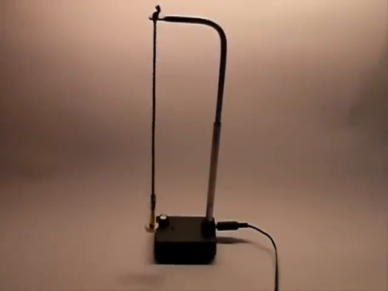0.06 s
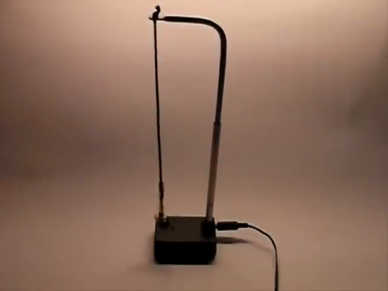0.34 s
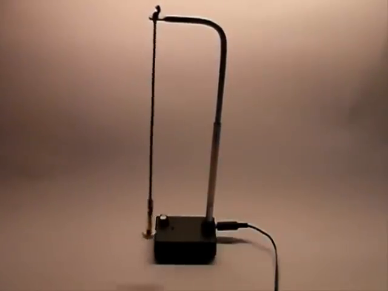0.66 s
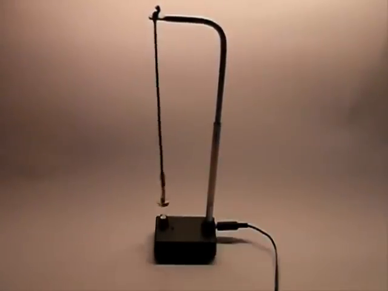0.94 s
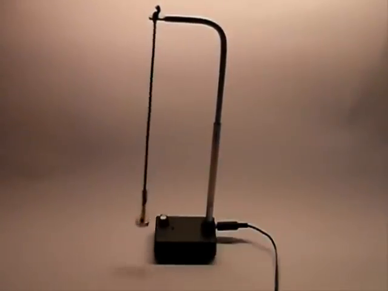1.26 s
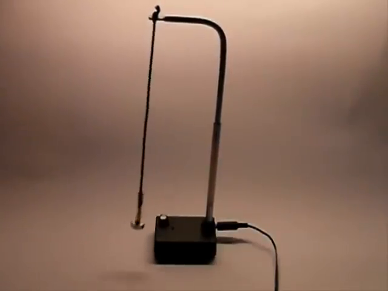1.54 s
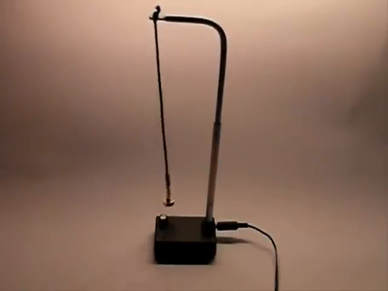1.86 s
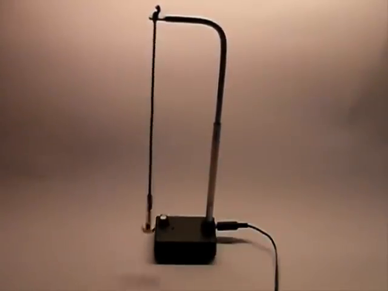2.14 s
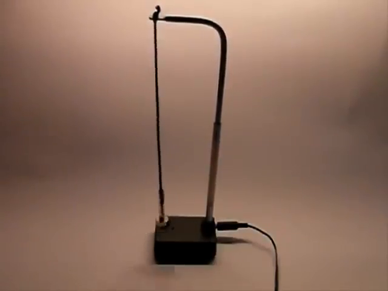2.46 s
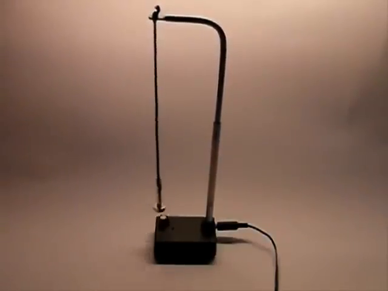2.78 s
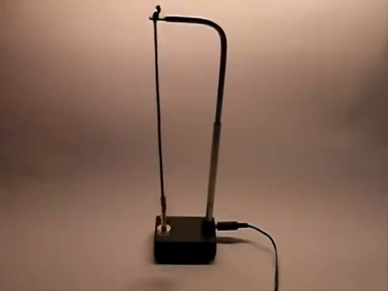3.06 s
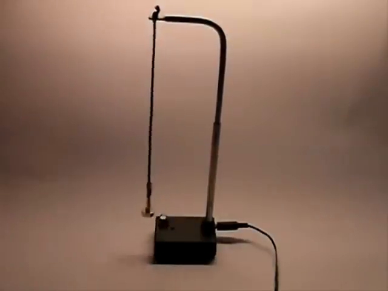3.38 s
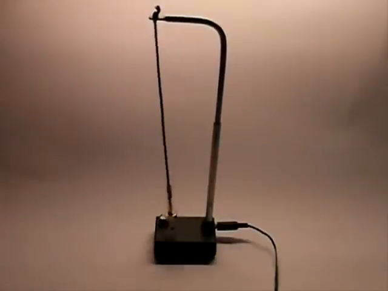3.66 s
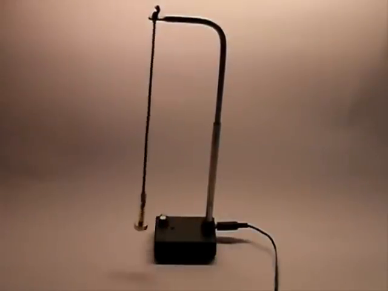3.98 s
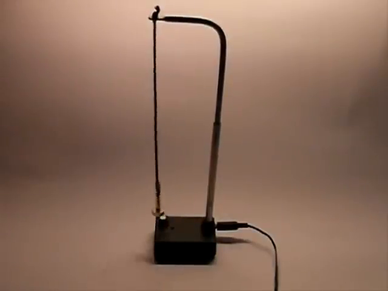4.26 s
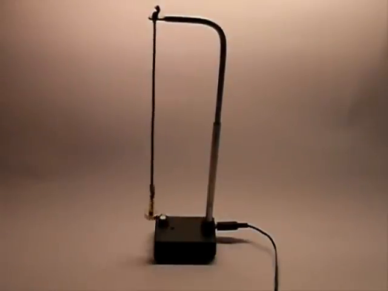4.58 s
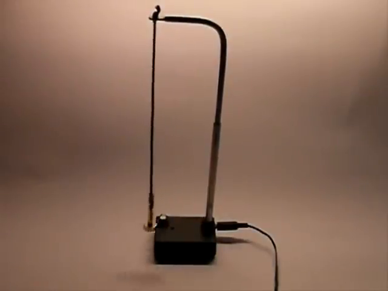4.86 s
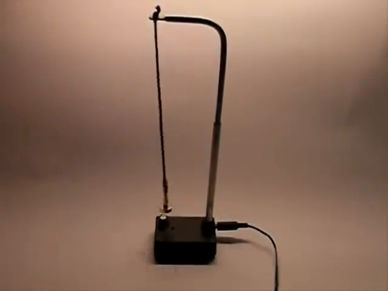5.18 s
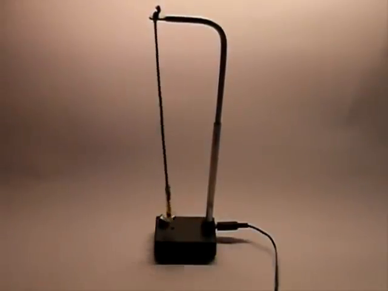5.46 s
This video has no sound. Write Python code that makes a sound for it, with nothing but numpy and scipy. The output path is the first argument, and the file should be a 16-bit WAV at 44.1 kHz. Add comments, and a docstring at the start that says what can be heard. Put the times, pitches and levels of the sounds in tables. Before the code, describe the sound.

Soft hiss runs throughout in a small, live room, with a magnet pendulum toy slightly right of the microphone. A light tick comes right at the start, then dull knocks on its plastic box with small ticks at about 0.3 and 0.5 seconds. Another soft knock and a tiny steel tink come at 1.6 seconds. From 1.9 seconds a quick rattle grows until the steel bob clacks hard on the base at 2.1 seconds, chattering, ringing briefly and overloading the microphone. This is the loudest moment. Several dull knocks fall between 3.1 and 3.8 seconds, with a thin, bright snap at about 3.4 as the bob glances off. At 4.1 seconds one heavy blow sets the whole box ringing briefly with a low thump. Faint ticks follow at 4.3 and 4.7 seconds, then only hiss remains, swelling slightly near 5.4 seconds.

```python
"""A light tick over soft hiss, then dull knocks: a magnet pendulum swings erratically over a small plastic
box on a table. The microphone is in the same small, live room, with the toy a little to its right.
Kicks from the coil knock the box and stand, and the hook ticks. A rattle grows until the steel bob clacks
hard on the base and overloads the microphone. Later the bob glances off with a thin snap,
and one heavy blow sets the whole box ringing."""
import sys
import numpy as np
from scipy import signal
from scipy.fft import rfft, irfft, next_fast_len
from scipy.io import wavfile

SR = 44100
rng = np.random.default_rng(int(sys.argv[2]) if len(sys.argv) > 2 else 0)


def bounce(signal):
    """Save signal as a 16-bit WAV file at the path given by the first command-line argument."""
    frames = np.transpose(np.atleast_2d(signal))
    limited = np.clip(frames, -1, 1)
    pcm = np.round(limited * 32767).astype(np.int16)
    wavfile.write(sys.argv[1], SR, pcm)


N = 248283
HIT_SAMPLES = SR // 3
AGE = np.arange(HIT_SAMPLES) / SR  # time since a contact, s

# room air and microphone hiss: (f/Hz, level/dB)
HISS_SPECTRUM = [(15, -46), (25, -14), (43, -6.5), (70, -10.5), (93, -4), (195, -2), (309, -3.5), (351, -1),
                 (529, -3.5), (602, -2), (840, -3), (2230, -6.5), (4450, -9), (10600, -11), (11500, -11.5),
                 (15000, -74.5), (22000, -120)]
# how alike the hiss is left and right: (f/Hz, correlation)
HISS_LIKENESS = [(30, 0.78), (300, 0.59), (1000, 0.62), (3000, 0.47), (6000, 0.317), (10000, 0.031)]
# light ticks of hook and bob: (t/s, level/dB, centre f/Hz, width/octaves, steel ring/dB)
TICKS = [(0.053, -50.5, 3000, 3.8, -12), (.335, -55, 5000, 1.5, -15), (.539, -47.5, 4000, 1.14, -27),
         (1.5857, -49.5, 3000, 1.7, -4.5), (2.6626, -60, 2310, 0.23, -18), (2.998, -50, 5580, 0.2, -3),
         (4.082, -46, 3000, 2.2, -25), (4.3236, -54, 2200, 0.92, -18), (4.7261, -50, 2400, 0.92, -20)]
# modes of the steel bob and stand: (f/Hz, level/dB, t60/s)
STEEL_MODES = [(660, -2, 0.19), (1522, -1.5, 0.12), (1596, -13.5, 0.19), (2110, 2, 0.2), (2249, -9, .22),
               (2575, -29, .22), (2791, 3.5, 0.12), (2820, 3, 0.077), (3000, -22, 0.14), (2810, -4, 0.29),
               (3041, -14.5, 0.36), (3230, -18.5, 0.53), (3490, -11.5, 0.53), (3870, -19, 0.296),
               (3834, -3.5, 0.054), (3842, -5.5, 0.26), (5000, -14, 0.17), (5900, -9.5, 0.186),
               (6845, -12.5, 0.2), (7450, -12.5, .22), (8860, -9, 0.216), (10350, 0.5, .22)]
# dull knocks, each a touch and a rebound:
# (t/s, level/dB, centre f/Hz, width/octaves, rebound delay/s, rebound over touch/dB, rebound f/Hz)
KNOCKS = [(.206, -60, 236, 0.48, 0.016, -10, 230), (0.3191, -42, 780, 0.42, .017, 1, 925),
          (0.5173, -42, 1070, .6, .0215, 1, 1005), (1.5875, -44, 568, .22, 0.018, -10.5, 540),
          (3.139, -47.5, 442, .3, .02, 1.5, 450), (3.367, -35, 161, .3, .028, -6, 342),
          (3.474, -46, 170, .8, .012, 2.5, 358), (3.749, -40, 358, 0.65, 0.0096, 4.5, 430)]
# modes of the plastic box on the table: (f/Hz, level/dB, t60/s)
BOX_MODES = [(104.8, -16, 0.3), (125, -7, 0.28), (172, -9.5, 0.29), (208.9, -5, 0.35), (356.6, 3.5, 0.21),
             (368.5, -5.5, 0.29), (401.7, -9, 0.24), (441.2, 2.5, 0.2), (590, -15, 0.42), (663.5, 1, 0.21),
             (684, -5, 0.29), (703, -15.5, 0.097), (756.7, -7.5, 0.206), (862, -11, 0.19),
             (875, -15.5, 0.21), (1000, -14.5, 0.14), (1119, -13, 0.15), (1243, -16.5, 0.201),
             (1376, -12, 0.23), (1620, -28.5, .19), (2094, -13.5, .17)]
# the bob strikes the base and chatters: (t/s, crack level/dB, ring level/dB, rise/s, ring width/octaves)
CLACKS = [(2.097, -16.5, -19, 0.0034, 0.26), (2.116, -7.5, -16, 0.00026, 2.8),
          (2.121, -23.5, -20, .0002, 3.4), (2.155, -17.5, -23.5, 0.00024, 1.9)]
# the crack of the bob on the base: (f/Hz, level/dB)
CRACK_SPECTRUM = [(25, -7.5), (100, -12.5), (300, -5.5), (750, 9.5), (1100, 5.5), (1700, 3), (2900, 9),
                  (4500, 4), (7000, 5), (11000, 5.5), (14000, -5)]
# the glancing touch: (f/Hz, level/dB)
SNAP_SPECTRUM = [(200, -12), (1300, -25), (1900, -12), (2700, -14), (4200, -2.5), (5800, 2), (6700, -3),
                 (7400, -17.5), (8400, -8), (11000, -3.5), (14000, -30)]
# a heavy blow chatters on the box, a light touch first: (t/s, level/dB, centre f/Hz, width/octaves)
THUMP_CONTACTS = [(4.065, -35.5, 400, .55), (4.083, -18.5, 644, 1.13), (4.097, -22, 330, 0.23),
                  (4.113, -25, 660, 0.47)]
# what the heavy blow excites: (f/Hz, level/dB)
THUMP_SPECTRUM = [(60, 2), (120, 17.5), (230, -2), (350, -2.5), (470, -3.5), (660, -0.5), (950, -3.5),
                  (1350, 7), (1700, -5.5), (2100, -2), (3500, -13)]
# early echoes off the walls: (delay/s, gain)
WALL_ECHOES = [(.0074, 0.41), (.0165, 0.57), (.0285, .6), (.0325, 0.56)]
# the room's reverberation: (f/Hz, t60/s)
ROOM_DECAY = [(100, 0.55), (500, 0.23), (1400, 0.23), (3000, 0.36), (5000, 0.28), (11000, 0.25)]
# how alike contacts and echoes are left and right: (f/Hz, correlation)
ROOM_LIKENESS = [(30, .7), (150, 0.62), (500, 0.81), (1000, 0.9), (3000, 0.56), (6000, 0.14), (10000, 0.2)]
# the late fall of every hit's tail: (age/s, level/dB)
TAIL_FADE = [(.08, 0), (.14, 1.5), (.2, -14), (.33, -45)]


def amp(db):
    """Decibels to gain."""
    return 10 ** (np.asarray(db) / 20)


def along(points, hz):
    """(f/Hz, value) points read on a log frequency axis."""
    f, values = np.transpose(points)
    return np.interp(np.log(hz + 1), np.log(f), values)


def bell(hz, centre_hz, octaves):
    """The band that one contact excites, in dB, with straight skirts."""
    return 30 * (1 - np.hypot(1, np.log2((hz + 1) / centre_hz) / (1.776 * octaves)))


def unit_hit(x):
    """Scale a hit to the energy of 40 ms at rms 1."""
    return x / np.sqrt(np.mean(x ** 2) * HIT_SAMPLES / (.04 * SR) + 1e-20)


def filtered(x, response):
    """Pass x through a gain given as a function of frequency."""
    n = x.shape[-1]
    padded = next_fast_len(n + 8192)
    return irfft(rfft(x, padded) * response(np.fft.rfftfreq(padded, 1 / SR)), padded)[..., :n]


def coloured(x, db_at):
    """Colour a hit by a dB curve, at minimum phase so that nothing sounds before the contact."""
    size = 2 * HIT_SAMPLES
    gain = amp(db_at(np.fft.rfftfreq(size, 1 / SR)))
    cepstrum = irfft(np.log(gain + 1e-6))
    cepstrum[1:HIT_SAMPLES] *= 2
    cepstrum[HIT_SAMPLES + 1:] = 0
    return irfft(rfft(x, size) * np.exp(rfft(cepstrum)))[..., :HIT_SAMPLES]


def stereo_noise(likeness, size):
    """White noise with a given likeness between left and right."""
    angle = lambda hz: np.arccos(np.clip(along(likeness, hz), -1, 1)) / 2
    mid_side_gains = lambda hz: np.array([np.cos(angle(hz)), np.sin(angle(hz))])
    mid, side = filtered(rng.standard_normal((2, size)), mid_side_gains)
    return np.array([mid + side, mid - side])


def add_hit(track, s, hit):
    """Mix a hit into the track at time s and fade its tail."""
    fade = amp(np.interp(AGE, *np.transpose(TAIL_FADE)))
    part = track[:, round(s * SR):][:, :HIT_SAMPLES]
    part += (hit * fade)[:, :part.shape[1]]


def in_room(contact_t60, walls_db, tail_db, build_s):
    """A contact as it reaches the microphone: direct sound, wall echoes, then a diffuse tail."""
    if contact_t60:
        direct = stereo_noise(ROOM_LIKENESS, HIT_SAMPLES) * amp(-60 * AGE / contact_t60)
    else:
        direct = np.tile(AGE == 0, (2, 1)) * 1.  # a single impulse
    direct /= np.linalg.norm(direct[0])
    echoes = sum(gain * np.roll(direct, round(delay * SR), axis=1) for delay, gain in WALL_ECHOES)
    hz, t, spectra = signal.stft(stereo_noise(ROOM_LIKENESS, HIT_SAMPLES), SR, nperseg=256)
    decay = amp(-60 * t / along(ROOM_DECAY, hz)[:, None])
    tail = signal.istft(spectra * decay, SR, nperseg=256)[1][:, :HIT_SAMPLES]
    tail *= 1 - np.exp(-AGE / build_s)
    return direct + amp(walls_db) * echoes + amp(tail_db) * tail / np.linalg.norm(tail[0])


def ring(modes, band, attack_s, blur, blur_hz, side_blur):
    """Decaying modes; overlapping echoes blur their level and phase, partly differently on each side."""
    knots = rng.standard_normal((len(modes), 3, 128, 2)) @ [1, 1j]  # shared, left, right
    hz, db, t60 = np.transpose(modes)
    db = db + band(hz)
    out = np.zeros((2, HIT_SAMPLES))
    for k in np.flatnonzero(db > db.max() - 36):
        drift = np.array([np.interp(AGE * blur_hz, np.arange(len(row)), row) for row in knots[k]])
        wave = (1 + blur * drift[0] + side_blur * drift[1:]) * np.exp(2j * np.pi * hz[k] * AGE)
        out += amp(db[k] - 60 * AGE / t60[k]) * wave.imag
    return unit_hit(out * (1 - np.exp(-AGE / attack_s)))


def hiss(start_db=-53.5, drift_db_per_s=-0.293, swell_s=5.37, swell_db=2.7, half_width_s=0.17):
    """Room air and microphone hiss sink slowly and swell once near the end."""
    air = filtered(stereo_noise(HISS_LIKENESS, N), lambda hz: amp(along(HISS_SPECTRUM, hz)))
    t = np.arange(N) / SR
    swell = np.exp(-((t - swell_s) / half_width_s) ** 2)
    return air / np.std(air.mean(0)) * amp(start_db + drift_db_per_s * t + swell_db * swell)


def tick(band, ring_db):
    """A tiny contact: too light to ring the box, it may make the steel tink."""
    contact = in_room(contact_t60=.02, walls_db=-6, tail_db=2.0, build_s=0.0068)
    click = unit_hit(coloured(contact, band))
    tink = ring(STEEL_MODES, band, attack_s=.001, blur=.2, blur_hz=39, side_blur=.3)
    return click + amp(ring_db) * tink


def hook_ticks():
    """The hook and bob tick now and then as the swing turns."""
    out = np.zeros((2, N))
    for s, db, centre_hz, octaves, ring_db in TICKS:
        add_hit(out, s, amp(db) * tick(lambda hz: bell(hz, centre_hz, octaves), ring_db))
    return out


def knock(band, ring_db):
    """A soft push: a short thud in the room and those box modes that lie in its band."""
    contact = in_room(contact_t60=0, walls_db=-4.5, tail_db=8.5, build_s=0.016)
    thud = unit_hit(coloured(contact, band))
    box = ring(BOX_MODES, band, attack_s=.005, blur=0.51, blur_hz=60, side_blur=.06)
    return (thud + amp(ring_db) * box) / np.hypot(1, amp(ring_db))


def coil_knocks(damp_db_per_s=28):
    """Each kick of the coil lands twice: a broad touch, then a rounder rebound that rings the box more."""
    out = np.zeros((2, N))
    uptake_db = lambda hz: -7 * np.log2(hz / 400)  # the box takes up low blows best
    damping = amp(-damp_db_per_s * AGE)  # the bob stays on the box
    for s, db, centre_hz, octaves, delay_s, rebound_db, rebound_hz in KNOCKS:
        touch = knock(lambda hz: bell(hz, centre_hz, octaves), ring_db=1 + uptake_db(centre_hz))
        rebound = knock(lambda hz: bell(hz, rebound_hz, octaves=0.17), ring_db=15 + uptake_db(rebound_hz))
        add_hit(out, s, amp(db) * damping * touch)
        add_hit(out, s + delay_s, amp(db + rebound_db) * damping * rebound)
    return out


def bob_rattle(start_s=1.915, count=11, growth_db_per_s=15, note_db_per_s=35, scatter_db=3.0):
    """The bob rattles ever harder until it hits the base, pumping up one note of the box."""
    out = np.zeros((2, N))
    times = np.linspace(start_s, CLACKS[0][0], count, endpoint=False)
    for s, (late, louder) in zip(times, rng.standard_normal((count, 2))):
        click = tick(lambda hz: bell(hz, centre_hz=2900, octaves=1.4), ring_db=-6.5)
        note = knock(lambda hz: bell(hz, centre_hz=655, octaves=.15), ring_db=-0.5)
        level_db = -54 + growth_db_per_s * (s - start_s) + scatter_db * louder
        note_db = -3 + note_db_per_s * (s - start_s)
        add_hit(out, s + .002 * late, amp(level_db) * (click + amp(note_db) * note))
    return out


def bob_clacks(steel_hz=2800, box_db=-17, box_hz=171):
    """Hard hits on the base: a broad crack and ringing steel. The hardest also shakes the box."""
    out = np.zeros((2, N))
    for s, crack_db, ring_db, rise_s, octaves in CLACKS:
        contact = in_room(contact_t60=.05, walls_db=-16, tail_db=-1.5, build_s=.006)
        crack = unit_hit(coloured(contact, lambda hz: along(CRACK_SPECTRUM, hz)))
        band = lambda hz: bell(hz, steel_hz, octaves)
        steel = ring(STEEL_MODES, band, attack_s=.0005, blur=.35, blur_hz=70, side_blur=.3)
        onset = 1 - np.exp(-AGE / rise_s)  # the first clack swells in more softly than the others
        add_hit(out, s, (amp(crack_db) * crack + amp(ring_db) * steel) * onset)
    hardest_s, hardest_db = max(CLACKS, key=lambda row: row[1])[:2]
    shake = knock(lambda hz: bell(hz, box_hz, octaves=0.89), ring_db=7.0)
    add_hit(out, hardest_s, amp(hardest_db + box_db) * shake)
    return out


def glancing_snap(s=3.3575, db=-28, damp_db_per_s=60):
    """The bob glances off with a thin snap; its highest treble reaches mostly the right side."""
    out = np.zeros((2, N))
    touch = in_room(contact_t60=.035, walls_db=-5, tail_db=3, build_s=.006) * amp(-damp_db_per_s * AGE)
    snap = unit_hit(coloured(touch, lambda hz: along(SNAP_SPECTRUM, hz)))
    lean_right = lambda hz: amp(np.outer([1, -1], along([(6000, -0.47), (8500, -6)], hz)))
    add_hit(out, s, amp(db) * filtered(snap, lean_right))
    return out


def box_thump(settle_s=0.047, damp_db=5):
    """The heavy blow wakes the whole box; the bob then settles on it and damps the ring."""
    out = np.zeros((2, N))
    damping = amp(-damp_db / (1 + np.exp(-(AGE - settle_s) / .005)))
    for s, db, centre_hz, octaves in THUMP_CONTACTS:
        hit = knock(lambda hz: along(THUMP_SPECTRUM, hz) + bell(hz, centre_hz, octaves), ring_db=14)
        add_hit(out, s, amp(db) * damping * hit)
    return out


def scene(lag_samples=1.56, pan_db=-0.57):
    """The toy stands a little right of the microphone, so the left side hears it later and softer."""
    toy = coil_knocks() + box_thump() + hook_ticks() + bob_rattle() + bob_clacks() + glancing_snap()
    sides = np.array([[1], [-1]])  # left, right
    left_lag = lambda hz: np.exp(-1j * np.pi * sides * hz * lag_samples / SR)
    return filtered(toy * amp(pan_db * sides) + hiss(), left_lag)


def record(dry, mic_hz=11600, top_hz=16000):
    """The microphone cuts the top treble and clips at full scale; the distortion is low-passed in turn."""
    below = lambda edge_hz: lambda hz: np.clip((edge_hz - hz) / 500 + .5, 0, 1)
    overloaded = np.clip(filtered(dry, below(mic_hz)), -1, 1)
    return filtered(overloaded, below(top_hz))


dry = scene()
out = record(dry)
bounce(out)
```